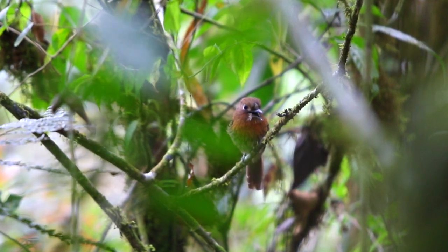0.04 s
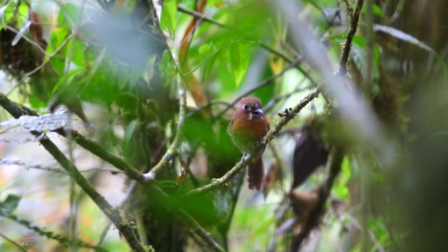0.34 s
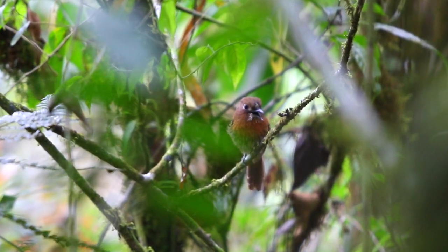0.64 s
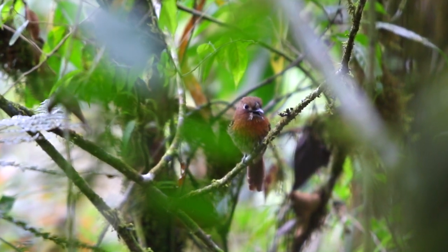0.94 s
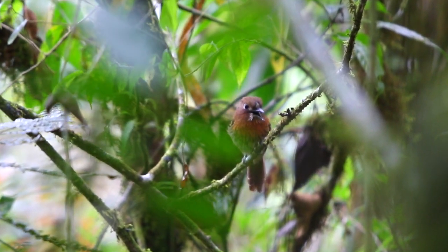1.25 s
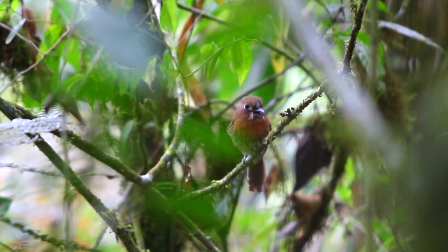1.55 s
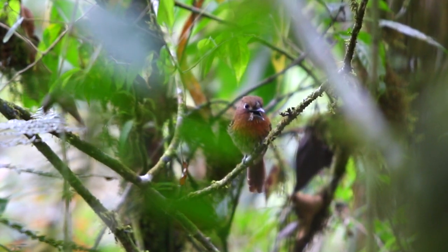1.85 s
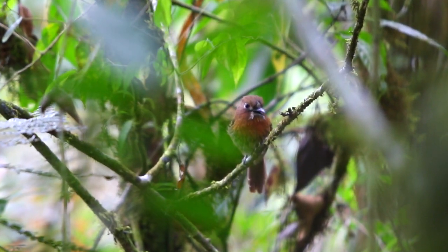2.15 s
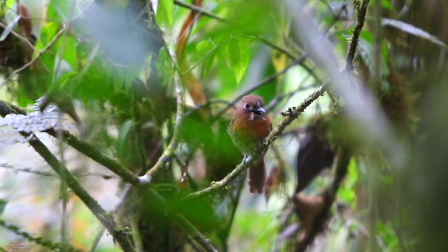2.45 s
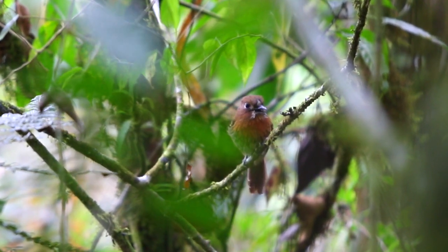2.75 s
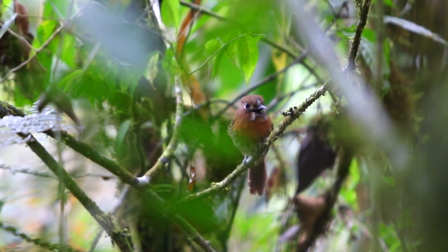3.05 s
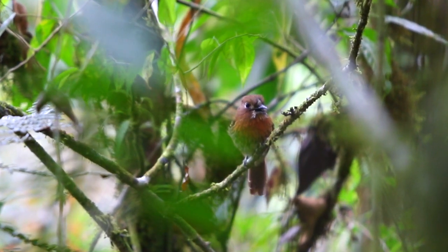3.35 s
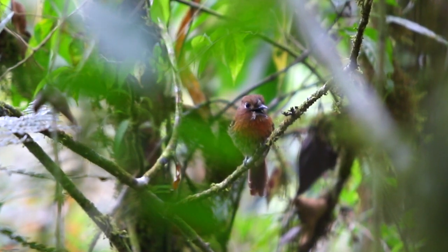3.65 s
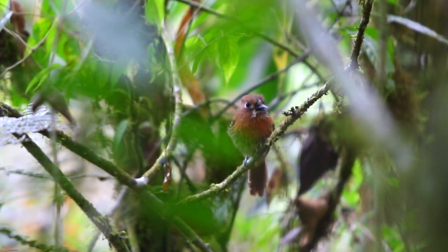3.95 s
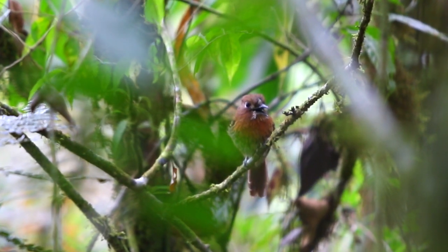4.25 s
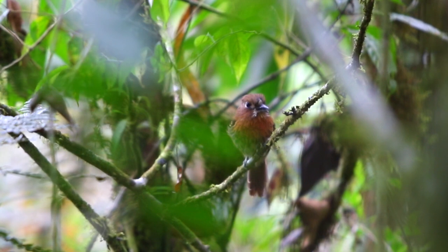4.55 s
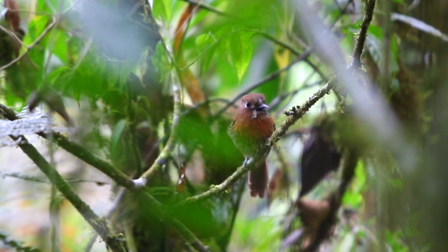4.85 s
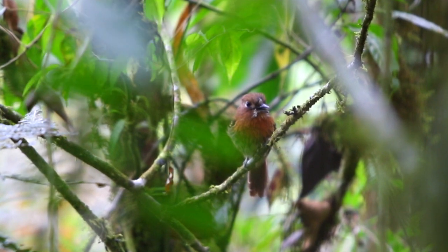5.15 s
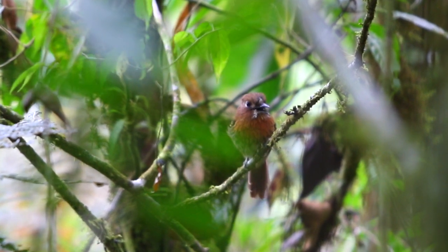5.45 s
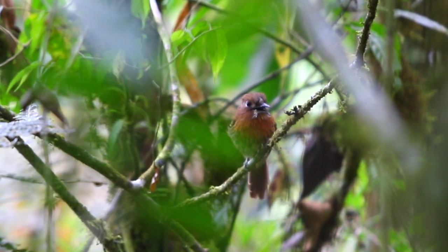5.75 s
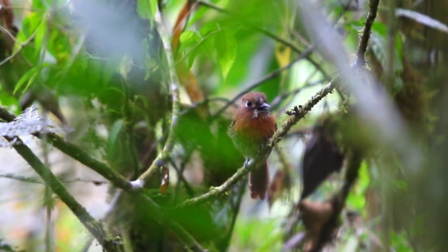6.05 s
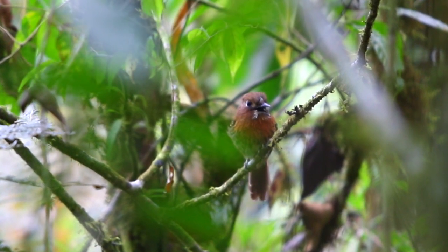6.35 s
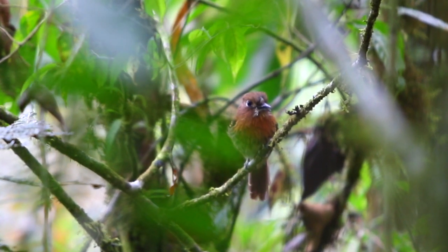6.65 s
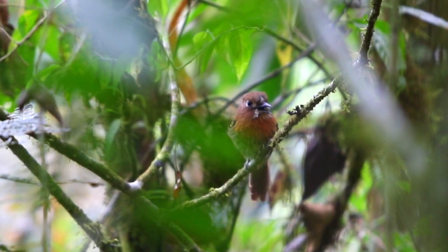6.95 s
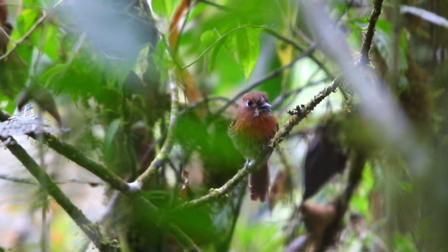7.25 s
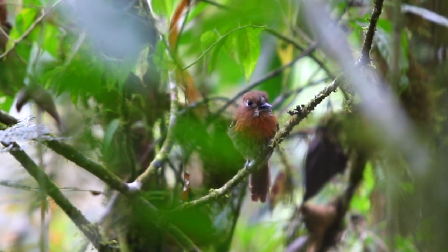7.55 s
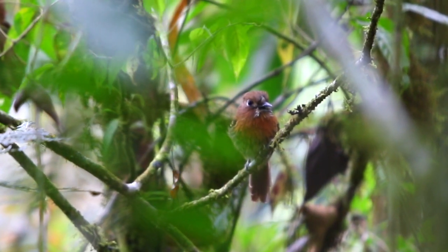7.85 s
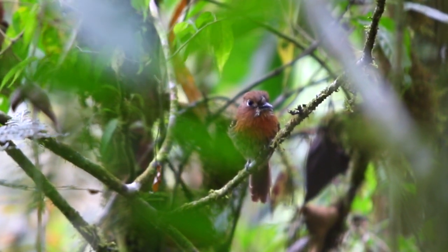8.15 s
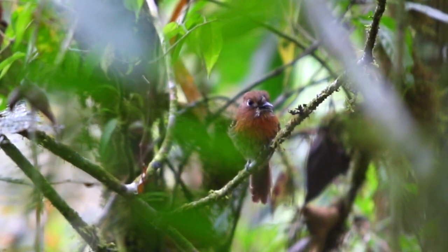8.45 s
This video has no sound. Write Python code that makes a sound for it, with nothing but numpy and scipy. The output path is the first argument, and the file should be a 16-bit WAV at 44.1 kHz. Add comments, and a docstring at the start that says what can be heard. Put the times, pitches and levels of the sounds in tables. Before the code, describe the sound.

A small forest bird sings about fourteen thin, very high whistles at an even pace, each rising with a fine tremble and a brief echo off the trees. Distant cicadas hiss steadily behind it. Early on, a nearer cicada swells into a buzz, holds for a few seconds and fades. A few soft microphone bumps come in the first part, with faint high chips and a low forest murmur underneath.

```python
"""Thin rising whistles, fourteen in all, each with a fine fast tremble: a puffbird on a branch.
Trunks and leaves throw the notes back, so they flutter and trail off. Behind, far cicadas merge
into a hiss; a nearer one buzzes for a few seconds, its two tymbals clicking in turn.
Faint high chips, a low forest murmur and soft bumps on the microphone housing lie underneath."""
import sys
import numpy as np
from scipy import signal
from scipy.fft import rfft, irfft
from scipy.io import wavfile
from scipy.ndimage import uniform_filter1d

SR = 44100
rng = np.random.default_rng(int(sys.argv[2]) if len(sys.argv) > 2 else 0)


def materialize(psi):
    """Save the field psi as 16-bit PCM at rate SR to the path in sys.argv[1].

    A 1-D psi becomes a single channel; in a 2-D psi each row is a channel.
    """
    bounded = np.clip(np.atleast_2d(psi).T, -1, 1)
    quanta = np.round(bounded * 32767).astype(np.int16)
    wavfile.write(sys.argv[1], SR, quanta)


N = 383654
TIME_S = np.arange(N) / SR

# bird's notes: (start [s], end [s], scoop depth [Hz], held pitch [Hz], top pitch [Hz],
#                climb exponent [1 = straight], relative mid-note level [dB])
SONG_NOTES = [(-0.25, 0.171, 600, 6760, 7440, 1.35, -21.5), (0.358, 0.773, 1500, 6866, 7450, 1.83, -20),
              (0.95, 1.374, 650, 6890, 7530, 1.53, -20.5), (1.571, 1.998, 1520, 6948, 7500, 1.74, -19),
              (2.206, 2.659, 700, 6905, 7570, 1.52, -19.5), (2.825, 3.231, 600, 6928, 7556, 2.1, -18.5),
              (3.419, 3.818, 593, 6864, 7456, 2.28, -17.5), (4.024, 4.409, 496, 6840, 7487, 2.85, -18),
              (4.675, 5.128, 750, 6880, 7417, 1.77, -19.5), (5.364, 5.797, 690, 6896, 7533, 2.33, -18.5),
              (6.039, 6.495, 600, 6836, 7490, 2.35, -18), (6.795, 7.23, 597, 6796, 7376, 1.74, -19),
              (7.568, 7.928, 890, 6813, 7366, 2.62, -20.5), (8.273, 8.68, 650, 6782, 7390, 1.74, -20)]
# near cicada, slowing: (time [s], click rate per tymbal [Hz])
TYMBAL_RATE_HZ = [(.8, 112.3), (1.45, 111.2), (1.6, 109.3), (1.9, 107.5), (2.36, 105.6), (2.96, 104.5),
                  (3.56, 103.3), (4.3, 102.4)]
# near cicada's envelope: (time [s], level [dB])
CICADA_ENVELOPE_DB = [(.6, -62), (1.3, -51), (1.6, -39.5), (2.6, -40), (3.8, -40.5), (4.1, -42.5),
                      (4.5, -55)]
# near cicada's resonances: (frequency [Hz], relative gain [dB])
CICADA_SPECTRUM_DB = [(2800, -31), (3350, 3.5), (3700, 1), (4000, 1.5), (4500, 2), (5200, -2.5),
                      (5850, 2.5), (6200, -3.5), (6800, -40)]
# far cicadas' envelope before ducking: (time [s], level [dB])
CHORUS_ENVELOPE_DB = [(.3, -39.5), (.7, -37.5), (1.6, -36.5), (3.7, -37.5), (4.7, -38.1), (7.3, -39.5),
                      (8.25, -38.5), (8.5, -36.2), (8.7, -37)]
# far cicadas' band: (frequency [Hz], relative gain [dB])
CHORUS_SPECTRUM_DB = [(2300, -40.5), (2750, -16), (3000, -5), (3300, 1.5), (3650, -1.5), (3950, 1),
                      (4250, -1.5), (4550, 0), (5100, -2.5), (5600, -6.5), (6300, -12), (7400, -28),
                      (8300, -52)]
# pips in the leaves: (time [s], pitch [Hz], peak before echoes [dB])
LEAF_CHIPS = [(.157, 11000, -54), (3.195, 8100, -49), (6.376, 12100, -57), (6.38, 9240, -55)]
# bumps on the housing: (time [s], envelope peak [dB])
HOUSING_BUMPS = [(.629, -51), (.804, -38.5), (1.075, -56), (1.149, -58), (1.519, -61), (2.779, -53)]
# forest wash: (frequency [Hz], relative gain [dB])
MURMUR_SPECTRUM_DB = [(25, -73), (60, -32.5), (100, -22.5), (150, -12), (210, -3.5), (290, 0), (420, -2.5),
                      (700, -3), (1000, -6.5), (2200, -12), (5000, -13), (8500, -39.5), (15000, -34.5)]


def bird(tremble_hz=58, drift_hz=11, jitter_hz=7.0, shake_db=1.2):
    """Song plus echoes. The octave, beamed forward and soaked up by leaves, dies sooner."""
    cycles = np.cumsum(tremble_hz * (1 + 0.0901 * wander(15))) / SR
    tremble = (1 + 0.3 * wander(8.5)) * np.sin(2 * np.pi * cycles)
    waver_hz = drift_hz * wander(27) + jitter_hz * wander(390)
    song = sum(whistle(row, tremble, waver_hz) for row in SONG_NOTES)
    tone, octave = song * gain(shake_db * wander(25))
    tone_echoes = gain(-8) * (trunks(tone, 0.003, 0.045) + foliage(tone, t60_s=0.3))
    octave_echoes = gain(-2.5) * trunks(octave, 0.0024, 0.025) + gain(-15.5) * foliage(octave, t60_s=0.17)
    return gain(-0.78) * (tone + tone_echoes + octave + octave_echoes)


def whistle(row, tremble, waver_hz, swell_db=4.5, octave_db=-41.5, throat_hz=6660, throat_edge_hz=130):
    """One note and its octave: scoops up, climbs ever faster, flicks down as the syrinx lets go."""
    start_s, end_s, scoop_hz, held_hz, top_hz, bend, level_db = row
    attack_s, release_s, scoop_s = 0.0016, 0.0055, 0.005
    lift_hz, lift_lead_s, lift_width_s = 60.4, 0.02, 0.0079
    flick_hz, flick_s = 1110, 0.016
    sounding = (TIME_S >= start_s) & (TIME_S < end_s)
    time_s = TIME_S[sounding]
    age_s, left_s = time_s - start_s, end_s - time_s
    progress = age_s / (end_s - start_s)
    depth_hz = 22 + 1.2 * time_s  # tremble deepens through the song
    pitch_hz = held_hz + (top_hz - held_hz) * progress ** bend
    pitch_hz += depth_hz * tremble[sounding] + waver_hz[sounding]
    pitch_hz -= scoop_hz * np.exp(-age_s / scoop_s)
    pitch_hz += lift_hz * np.exp(-((left_s - lift_lead_s) / lift_width_s) ** 2)
    pitch_hz -= flick_hz * np.clip(1 - left_s / flick_s, 0, 1) ** 2
    phase = 2 * np.pi * np.cumsum(pitch_hz) / SR
    gate = np.sqrt(2) * smooth_step(age_s / attack_s) * smooth_step(left_s / release_s)
    # throat tuned to the held note: muffles the low ends of scoop and flick
    throat = 1 / np.sqrt(1 + np.exp((throat_hz - pitch_hz) / throat_edge_hz))
    tone = throat * gain(level_db + swell_db * (progress - 0.5)) * np.sin(phase)
    octave = gain(octave_db) * np.sin(2 * phase)
    partials = np.zeros((2, N))
    partials[:, sounding] = gate * [tone, octave]
    return partials


def cicada():
    """Near cicada: a resonant buzz that swells, holds and fades as it slows."""
    buzz = shape_spectrum(tymbals(curve(TYMBAL_RATE_HZ)), CICADA_SPECTRUM_DB)
    return buzz * gain(curve(CICADA_ENVELOPE_DB))


def tymbals(rate_hz, second_ratio=0.56, unsteadiness=0.0006):
    """Two tymbals click in turn; the forest smears the clicks into a buzz."""
    cycles = np.cumsum(rate_hz * (1 + unsteadiness * wander(12))) / SR
    first, second = (np.diff(np.floor(cycles + lag), prepend=0) for lag in (0, 0.5))
    clicks = first + second_ratio * second
    return gain(-12) * clicks + foliage(clicks, t60_s=0.4)


def chorus(trim_db=-0.15, flutter_db=0.4, buzz_db=-4, slowing_per_s=0.003, count=4):
    """Far cicadas: a hiss in which a few still buzz, ducked while the near one sings."""
    rates_hz = rng.uniform(98, 118, count)
    buzz = unit_rms(sum(tymbals(hz * (1 - slowing_per_s * TIME_S)) for hz in rates_hz))
    hiss = shape_spectrum(rng.standard_normal(N) + gain(buzz_db) * buzz, CHORUS_SPECTRUM_DB)
    level = gain(curve(CHORUS_ENVELOPE_DB))
    near_level = gain(curve(CICADA_ENVELOPE_DB))
    power_share = np.clip(1 - 0.75 * (near_level / level) ** 2, 0.3, 1)
    return hiss * level * np.sqrt(power_share) * gain(trim_db + flutter_db * wander(29))


def chips(rise_s=0.0037, rasp_rms_hz=250):
    """Short raspy pips trailing off among the leaves."""
    pips = np.zeros(N)
    rasp_hz = rasp_rms_hz * wander(700)
    for start_s, pitch_hz, peak_db in LEAF_CHIPS:
        age_s = np.maximum(TIME_S - start_s, 0)
        phase = 2 * np.pi * np.cumsum(pitch_hz + rasp_hz) / SR
        pips += gain(peak_db) * pulse(age_s / rise_s) * np.sin(phase)
    return pips + gain(4.5) * foliage(pips, t60_s=0.13)


def bumps(body_hz=95, rise_s=0.0036):
    """Each bump pushes the microphone housing through a cycle or two."""
    thumps = np.zeros(N)
    for start_s, peak_db in HOUSING_BUMPS:
        age_s = np.maximum(TIME_S - start_s, 0)
        thumps += gain(peak_db) * pulse(age_s / rise_s) * np.sin(2 * np.pi * body_hz * age_s)
    return thumps


def murmur(level_db=-44.5, swell_db=0.24):
    """Steady low forest wash, perhaps a far stream."""
    wash = shape_spectrum(rng.standard_normal(N), MURMUR_SPECTRUM_DB)
    return wash * gain(level_db + swell_db * wander(6.5))


def trunks(x, first_s, last_s, count=9):
    """Distinct echoes off trunks and ground, later ones weaker."""
    delays_s = first_s + (last_s - first_s) * (np.arange(count) + rng.random(count)) / count
    weights = np.exp(-delays_s / last_s)
    weights /= np.linalg.norm(weights)
    return sum(weight * np.pad(x, (round(s * SR), 0))[:N] for s, weight in zip(delays_s, weights))


def foliage(x, t60_s, build_s=0.014):
    """Countless faint leaf echoes: a decaying noise tail of unit energy."""
    age_s = TIME_S[:SR]
    envelope = gain(-60 * age_s / t60_s) * (1 - np.exp(-age_s / build_s))
    tail = rng.standard_normal(SR) * envelope
    return signal.fftconvolve(x, tail / np.linalg.norm(tail))[:N]


def shape_spectrum(x, points):
    """Filter by (frequency [Hz], gain [dB]) points; rms 1."""
    hz, db = np.transpose(points)
    bins_hz = np.fft.rfftfreq(N, 1 / SR)
    response_db = np.interp(np.log(bins_hz + 1), np.log(hz), db)
    return unit_rms(irfft(rfft(x) * gain(response_db), N))


def wander(bandwidth_hz):
    """Smooth random drift; rms 1."""
    bins_hz = np.fft.rfftfreq(N, 1 / SR)
    lowpass = np.exp(-(bins_hz / bandwidth_hz) ** 2)
    return unit_rms(irfft(rfft(rng.standard_normal(N)) * lowpass, N))


def curve(rows):
    """(time [s], value) rows, interpolated per sample."""
    return np.interp(TIME_S, *np.transpose(rows))


def pulse(x):
    """Rise to 1 at x = 1, then decay."""
    return x * np.exp(1 - x)


def smooth_step(x):
    """Smooth rise over x = 0 to 1."""
    return np.sin(np.pi / 2 * np.clip(x, 0, 1)) ** 2


def gain(db):
    """Decibels to amplitude."""
    return 10 ** (np.asarray(db) / 20)


def unit_rms(x):
    """Scale to rms 1."""
    return x / np.sqrt(np.mean(x ** 2) + 1e-20)


def scene():
    """All sources at one microphone."""
    return (bird() + cicada() + chorus() + chips() + murmur() + bumps())[None]


def record(dry, settle_s=0.25, expansion=0.1, pivot_db=-24, cutoff_hz=15700):
    """Gentle noise suppressor: gain sags in pauses, creeps back under notes. Then a low-pass."""
    power = uniform_filter1d(dry[0] ** 2, size=1024)
    level_db = 10 * np.log10(abs(power) + 1e-12)
    pole = np.exp(-1 / (settle_s * SR))
    gain_db = expansion * signal.lfilter([1 - pole], [1, -pole], level_db - pivot_db)
    lowpass = signal.firwin(255, cutoff_hz, window=("kaiser", 9), fs=SR)
    return signal.oaconvolve(dry * gain(gain_db), lowpass[None], "same")


dry = scene()
out = record(dry)
materialize(out)
```